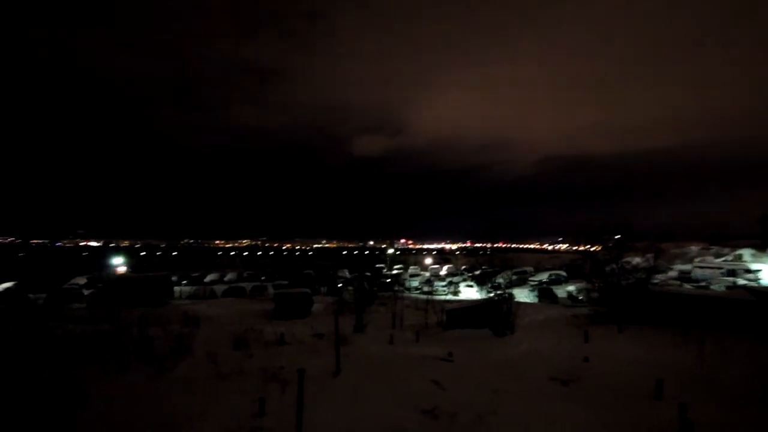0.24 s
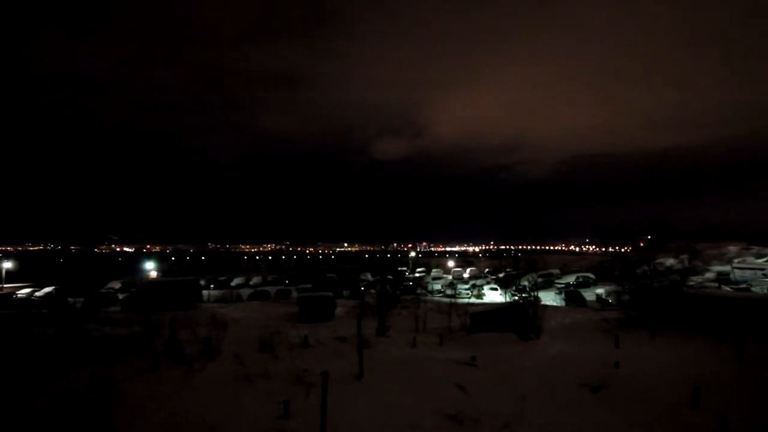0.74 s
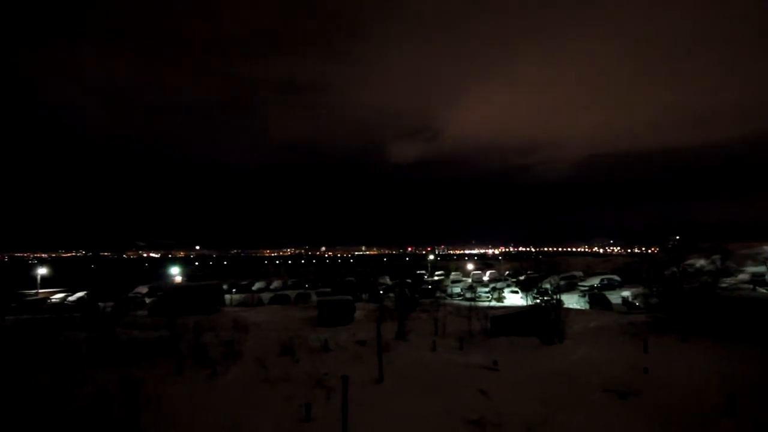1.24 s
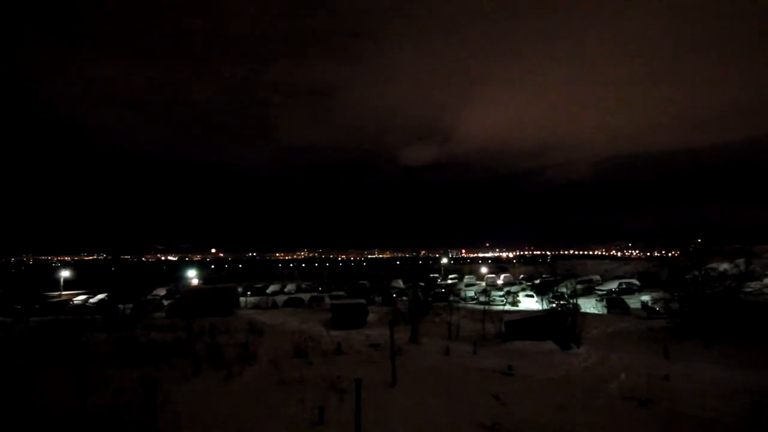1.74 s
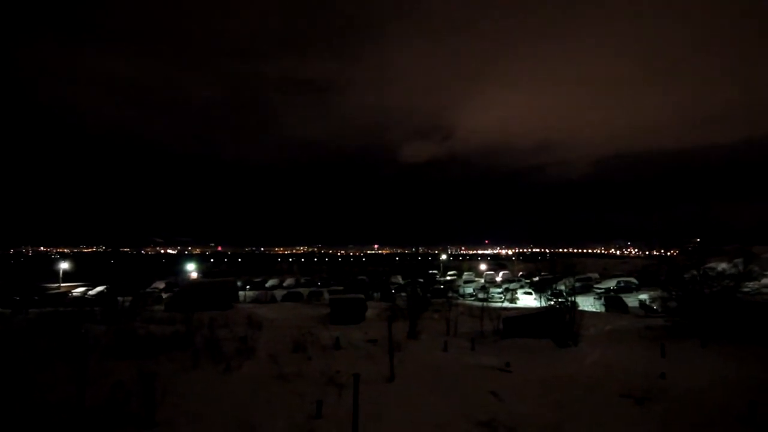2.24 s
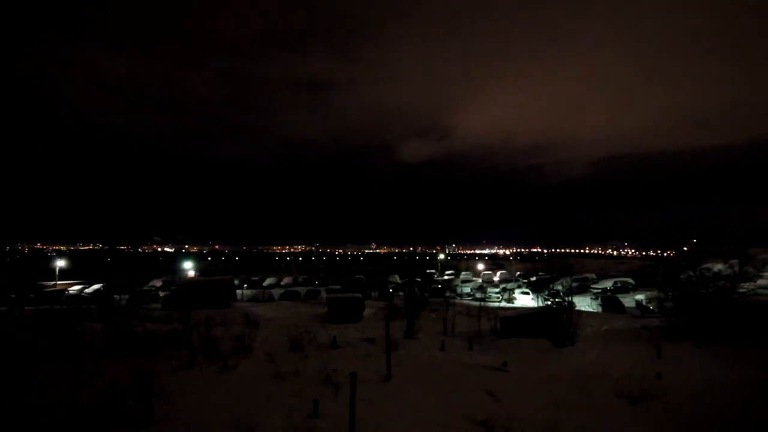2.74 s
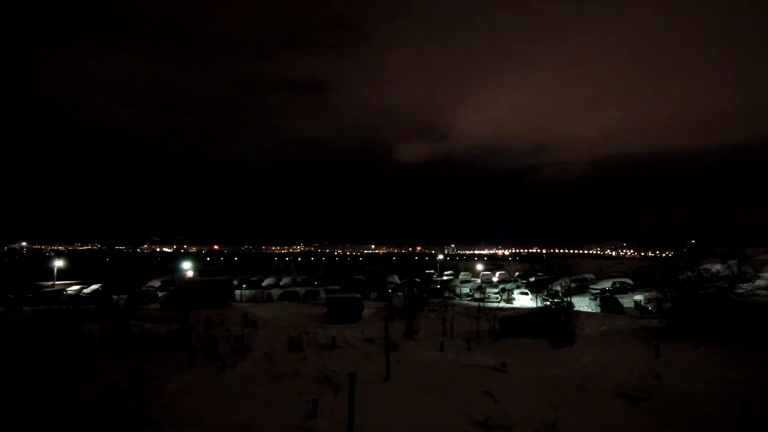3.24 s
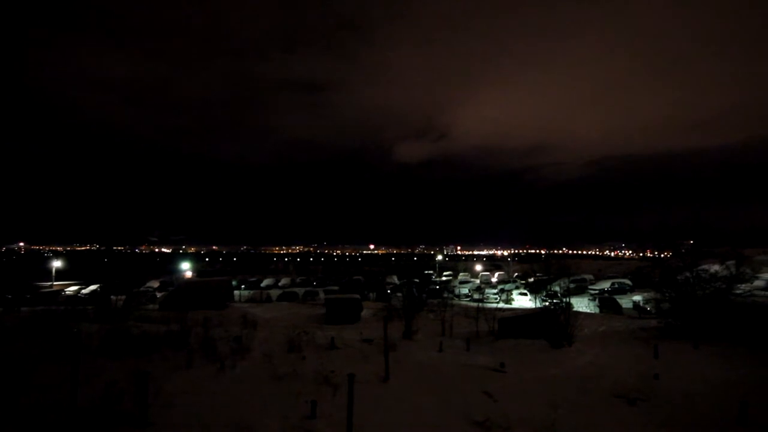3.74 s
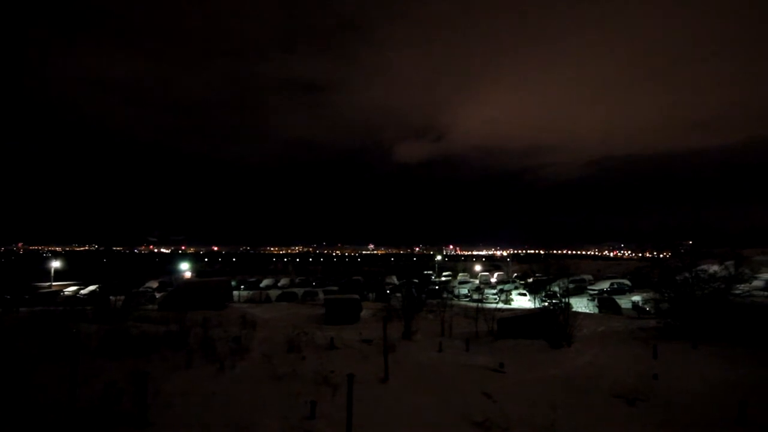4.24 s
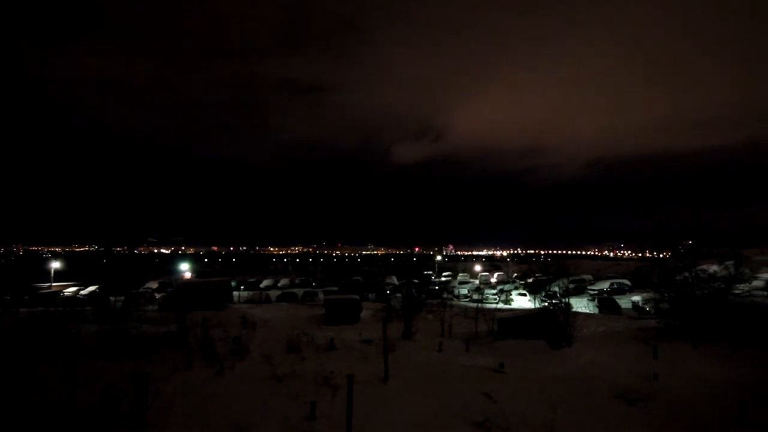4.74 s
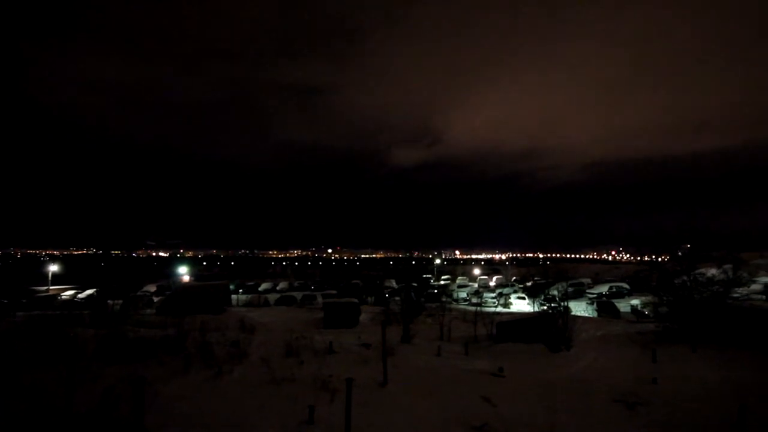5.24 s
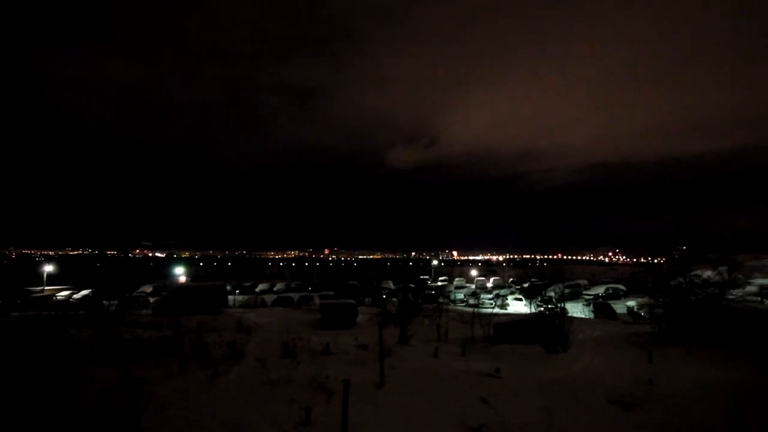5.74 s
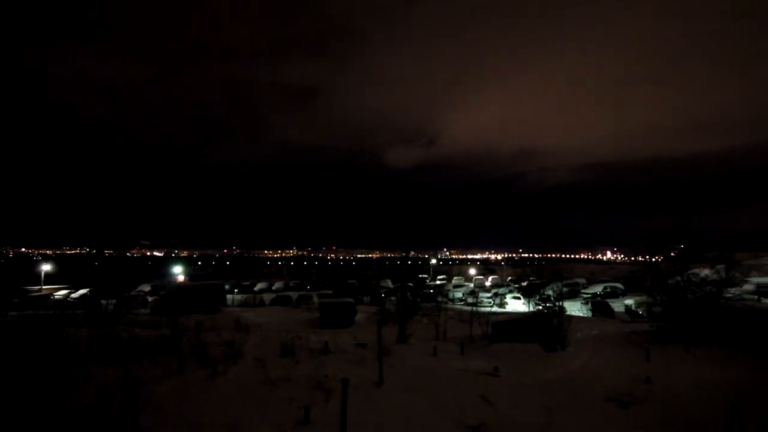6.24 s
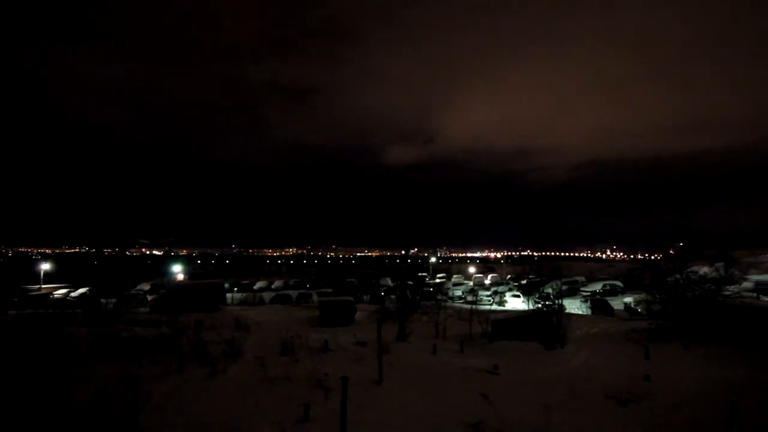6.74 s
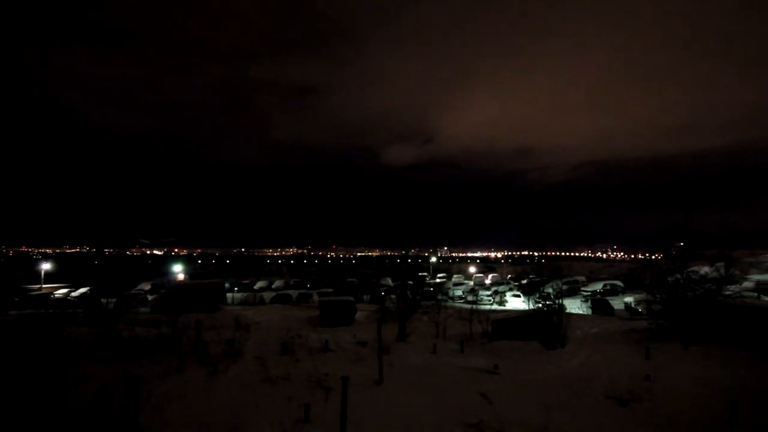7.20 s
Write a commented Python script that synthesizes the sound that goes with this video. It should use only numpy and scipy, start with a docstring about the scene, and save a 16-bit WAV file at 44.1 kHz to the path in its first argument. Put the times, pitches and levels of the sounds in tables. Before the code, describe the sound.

Outdoors on a snowy hillside at night, hundreds of distant fireworks blend into a steady, dull, bubbling rumble. Single booms and hollow knocks stand out, and nearer rockets bang, then crack back from house walls a quarter second later. One enormous low boom overloads the handheld camera's microphone past the middle, then bangs come thicker until the end. Small finger ticks and sleeve rustle occur early.

```python
"""Countless far fireworks over a city merge into a rumble with single booms, heard from a snowy hillside at night.
Far bursts are grains and thuds of noise and decaying swings; bangs are damped pressure swings with reflections.
Nearer rockets also wash back from a wooded slope as filtered grains and crack off house walls as delayed echoes.
One heavy shell overloads the microphone. The hand-held camera ticks, a sleeve rustles and a cuff scrapes."""
import sys
import numpy as np
from scipy import signal
from scipy.fft import rfft, irfft, next_fast_len
from scipy.io import wavfile
from scipy.ndimage import map_coordinates

SR = 44100
rng = np.random.default_rng(int(sys.argv[2]) if len(sys.argv) > 2 else 0)


def inscribe(sig):
    """Save sig as 16-bit PCM at rate SR to the path in sys.argv[1].

    A 1-D sig is mono; a 2-D sig holds one channel per row.
    Samples are clipped to [-1, 1] before scaling.
    """
    pcm = np.round(np.clip(np.atleast_2d(sig).T, -1, 1) * 32767)
    wavfile.write(sys.argv[1], SR, pcm.astype(np.int16))


N = 329427

# nearer rockets: (t/s, bang level/dB, bang f/Hz, direct snap level/dB, slope wash level/dB,
# near walls level/dB, far wall crack level/dB, far wall thump level/dB, treble level/dB)
ROCKETS = [ (0.408, -4, 450, -16.5, -23.5, -9.5, 4, -17, 0), (2.248, -16, 438, -14, -25, -11.5, -3.5, 0, 2),
           (2.628, -24, 406, -36, -27, -16, -30, -26, -5), (3.381, -7, 410, -20, -24, -10.5, -8, -7, 1.5),
           (3.532, -8, 300, -16, -28, -12.5, -3.5, -8, 2), (4.097, -3, 420, -17.5, -21, -13, 0, -2, 0.5),
           (4.9172, -2, 497, -9, -21.5, -9, -2, -1.5, 2),
           (5.228, -12, 493, -21.5, -27, -13, -6.5, -10, -0.5),
           (6.005, -6.5, 638, -19, -24, -14.5, -10, -7.5, -0.5),
           (6.031, -6.5, 524, -16, -23.5, -11.5, -4.5, -9, -2.5),
           (6.335, -4.5, 373, -33, -34, -27.5, -18, -25, 3),
           (6.518, -3, 355, -13, -26.5, -11, -6, -5.5, 2.5),
           (7.0837, -3.5, 552, -6.5, -27, -9, -4, -7, 3.5), (7.295, -3, 445, -15, -28, -13.5, -15, -11, 0)]
# echoes from the same near walls for every rocket: (delay t/s, dull knock level/dB, sharp spatter level/dB)
NEAR_WALLS = [(.024, -1.5, -20.5), (.068, 0.5, -9), (.1, -2.5, -15), (.125, 1, -10), (.2, -2, -18)]


def amp(db):
    """Turn decibels into an amplitude factor."""
    return 10 ** (np.asarray(db) / 20)


def unit(x):
    """Scale a sound to rms 1."""
    return x / np.sqrt(np.mean(x ** 2) + 1e-20)


def level_curve(rows):
    """Draw straight lines through (t/s, level/dB) points, one value per sample."""
    s, db = np.transpose(rows)
    return np.interp(np.arange(N) / SR, s, db)


def add(track, s, sound):
    """Mix a sound into the track at s seconds."""
    start = max(round(s * SR), 0)
    track[start:start + len(sound)] += sound[:max(N - start, 0)]


def coloured(x, spectrum, size=4096):
    """Shape x with the minimum-phase filter through (f/Hz, level/dB) points, then scale it to rms 1."""
    hz, db = np.transpose(spectrum)
    bins_hz = np.fft.rfftfreq(size, 1 / SR)
    gain = amp(np.interp(np.log(bins_hz + 1), np.log(hz), db))
    # folding the cepstrum makes the filter causal, so attacks stay sharp
    cepstrum = irfft(np.log(gain))
    cepstrum[1:size // 2] *= 2
    cepstrum[size // 2 + 1:] = 0
    impulse = irfft(np.exp(rfft(cepstrum)))
    return unit(signal.fftconvolve(x, impulse)[:N])


def lowpass(x, hz):
    """Roll off the highs above hz at 12 dB per octave."""
    return signal.sosfilt(signal.butter(2, min(hz, SR / 2 - 100), fs=SR, output="sos"), x)


def patter(rate, spread_db):
    """Impulses at random moments, rate a second on average, of random sign and uneven strength."""
    strength = amp(spread_db * np.clip(rng.standard_normal(N), -2, 2))
    hits = rng.random(N) < rate / SR
    return hits * strength * rng.choice([-1, 1], N)


def wobble(rate):
    """A smooth random curve, rate knots a second."""
    return map_coordinates(rng.standard_normal(N // 50), [np.arange(N) * rate / SR], mode="wrap")


def swells(rows, attack, t60):
    """Joint envelope of (start t/s, hold t/s, level/dB) events that build, hold and die; their powers add."""
    power = np.zeros(N)
    for s, hold, db in rows:
        t = np.arange(int((attack + hold + t60) * SR)) / SR
        rise = np.minimum(t / attack, 1)
        fall_db = 60 * np.maximum(t - attack - hold, 0) / t60
        add(power, s, (rise * amp(db - fall_db)) ** 2)
    return np.sqrt(power)


def strokes(rows):
    """Envelope of (middle t/s, half length t/s, level/dB) strokes that swell and fade smoothly."""
    t = np.arange(N) / SR
    return sum(amp(db) * np.exp(-((t - s) / half) ** 2) for s, half, db in rows)


def report(hz, cycles, air_hz, scatter, span, rise=0):
    """A pressure swing of peak 1, built over rise cycles and damped 60 dB in cycles, with a duller trail.

    The trail of reflections from ground and nearby walls lasts about span seconds."""
    t = np.arange(SR // 8) / SR
    front = 1 - np.exp(-(t * hz / (rise + 1e-6)) ** 2)
    decay = amp(-60 * t * hz / cycles)
    swing = lowpass(front * np.sin(2 * np.pi * hz * t) * decay, air_hz)
    # suction follows the push, so no net pressure is left
    swing = signal.sosfilt(signal.butter(2, 0.5 * hz, "high", fs=SR, output="sos"), swing)
    swing /= np.abs(swing).max()
    # a handful of separate paths, which comb the spectrum
    delays = 1 / hz + span * (np.arange(7) + rng.random(7)) / 7
    places = np.minimum(delays * SR, len(t) - 1).astype(int)
    strengths = rng.choice([-1, 1], len(delays)) * np.exp(-delays / span)
    paths = np.bincount(places, strengths, len(t))
    trail = lowpass(signal.fftconvolve(swing, paths)[:len(t)], 2600)
    return swing + scatter * trail / np.abs(trail).max()


def boom(hz):
    """A burst dulled by distance: the lower it is, the less treble is left."""
    return report(hz, cycles=6.0, air_hz=2.14 * hz, scatter=0.54, span=.018)


def crack(hz):
    """A sharp snap that rings briefly; the duller it is, the stronger the hollow knock under it."""
    snap = report(hz, cycles=1.72, air_hz=2000 + 1.9 * hz, scatter=0.65, span=.013)
    ring = report(1.42 * hz, cycles=4.4, air_hz=2370, scatter=0.31, span=0.016)
    knock = report(hz=471, cycles=9, air_hz=970, scatter=1.2, span=0.01375)
    mix = amp(-5.5) * snap + amp(-16.5) * ring + amp(-10.0) * 1100 / hz * knock
    return lowpass(mix, hz=5500)


def barrage():
    """Hundreds of far bursts a second run together; less distant ones fill the midrange, and strings crackle."""
    # level of the far barrage, with the camera's ducking after loud bangs drawn in: (t/s, level/dB)
    far_level = [(0.0, -19), (.6, -20), (.72, -20), (.98, -18), (1.35, -18), (1.9, -20), (2.25, -19),
                 (2.45, -18.5), (2.6, -22.5), (2.75, -16), (2.93, -22), (3.1, -18.5), (3.6, -19.5),
                 (4.12, -20), (4.5, -22.5), (4.66, -19), (4.76, -23), (4.92, -19), (5.2, -24), (5.6, -18.5),
                 (5.9, -20), (6.3, -19), (6.85, -20), (7.14, -17.5), (7.47, -21)]
    # level of its midrange: (t/s, level/dB)
    mid_level = [(0, -32), (.15, -40.5), (.35, -32.5), (.85, -32.5), (1.1, -33), (1.3, -34.5),
                 (1.52, -46.5), (1.66, -29), (1.85, -45), (2.06, -30), (2.2, -50), (2.6, -41.5),
                 (2.9, -32.5), (3.15, -29), (3.35, -34.5), (3.95, -34), (4.48, -29), (4.75, -34),
                 (5.3, -34.5), (5.65, -27), (5.9, -33.5), (6.4, -31.5), (7.47, -30)]
    # far strings of firecrackers: (start t/s, hold t/s, level/dB)
    cracker_strings = [(0.68, 0.14, -42), (1.2, 0.24, -38), (2.93, 1, -40), (4.53, 0.013, -32.5),
                       (5.45, 0.58, -40.5), (6.3, 0.84, -33.5)]
    # tone colours of far rumble, midrange and firecrackers: (f/Hz, level/dB)
    rumble_colour = [(20, -16.5), (50, -8.5), (95, -5), (135, 1), (180, -1), (240, 1.5), (320, -1.5),
                     (420, 2.5), (550, -9.5), (800, -18.5), (1200, -29.5), (2500, -56.5), (6000, -88)]
    mid_colour = [(250, -25), (520, -3.5), (800, -1.5), (1150, -15), (2500, -33), (6000, -67)]
    crackle_colour = [(250, -27.5), (700, 8.5), (1200, 7.5), (2400, 0.5), (3200, -12), (4200, -17),
                      (6000, -40.5), (16000, -71)]
    roar_db, thuds_db = -.5, -6  # merged and separate bursts, against the far level
    crackle_floor_db = -45  # the crackle of the whole town never stops

    roar = coloured(patter(rate=900, spread_db=2.0), rumble_colour)
    swell = amp(1.97 * wobble(rate=12))
    bursts = amp(roar_db) * swell * roar + amp(thuds_db) * thuds(count=520)
    far = amp(level_curve(far_level)) * bursts

    mid_grains = coloured(patter(rate=400, spread_db=0.5), mid_colour)
    mids = amp(level_curve(mid_level) + 3.0 * wobble(rate=18)) * mid_grains

    string_swells = swells(cracker_strings, attack=0.034, t60=0.65)
    crackle_envelope = np.hypot(amp(crackle_floor_db), string_swells)
    crackle = crackle_envelope * coloured(patter(rate=1400, spread_db=1), crackle_colour)
    return far + mids + crackle


def thuds(count):
    """Far shells that just stand out of the rumble, each with its own pitch and a few cycles of life."""
    pitch, size = rng.standard_normal((2, count, 1))
    start = rng.integers(0, N, (count, 1))
    n = np.arange(SR // 16)
    hz = 310 * np.exp(0.42 * np.clip(pitch, -2.2, 1.3))
    cycle = hz * n / SR
    envelope = cycle * np.exp(-cycle / 1.5)
    swings = amp(1.2 * np.clip(size, -2, 1)) * np.sin(2 * np.pi * cycle) * envelope
    return unit(np.bincount((start + n).ravel(), swings.ravel(), N)[:N])


def singles():
    """Single booms, hollow knocks and sharp snaps; each keeps treble in proportion to its pitch."""
    # single booms: (t/s, level/dB, f/Hz)
    lone_booms = [ (0.014, -5.5, 356), (0.213, -7.5, 258), (0.337, -8, 315), (0.768, -16.5, 71),
                  (0.807, -4, 215), (0.812, -1, 394), (0.912, -4, 278), (1.005, -12, 300), (1.038, -21, 60),
                  (1.158, -6.5, 264), (1.33, -20, 269), (1.58, -7, 237), (1.702, -6.5, 320),
                  (1.752, -10.5, 232), (2.014, -4, 188), (2.07, -4, 174), (2.078, -1.5, 366),
                  (2.374, 2.5, 179), (2.534, -4.5, 384), (2.773, -4, 284), (2.788, -17.5, 70),
                  (3.019, -18, 91), (3.07, -11.5, 183), (3.135, -15.5, 69.4), (3.146, -3.5, 193),
                  (3.421, -10, 250), (3.641, -11, 94), (3.734, -19.5, 80), (3.846, -3, 427),
                  (4.075, -10, 156), (4.16, -7.5, 300), (4.446, -14, 413), (4.645, -7, 252),
                  (4.835, -10.5, 434), (5.025, -22, 68.5), (5.537, -10, 198), (5.707, -7.5, 276),
                  (6.053, -4, 360), (6.125, -4.5, 390), (6.275, -13, 115), (6.419, -4, 300),
                  (6.575, -14, 120), (6.893, -8, 258), (7.234, -12.5, 100), (6.99, -10, 260),
                  (7.2848, -1, 398)]
    # hollow knocks: wall echoes of rocket bangs, and a few other short knocks: (t/s, level/dB, f/Hz)
    extra_knocks = [(1.244, -13, 670), (1.606, -18, 680), (3.404, -16, 690), (3.557, -7.5, 610),
                    (3.632, -12.5, 646), (4.109, -3.5, 440), (4.122, -7, 465), (4.942, -9, 560),
                    (5.044, -8, 616), (5.353, -9.5, 690), (5.667, -9, 706), (6.031, -8, 565),
                    (6.642, -13, 557), (7.109, -7.5, 645), (7.154, -10.5, 560), (7.212, -8.5, 634),
                    (7.417, -16, 616)]
    # sharp snaps: stronger wall echoes of rockets, and single firecrackers: (t/s, level/dB, f/Hz)
    sharp_snaps = [(0.472, -12, 2200), (0.545, -11, 1800), (0.57, -17, 2400), (1.139, -17, 1900),
                   (1.215, -19.5, 2150), (1.303, -25, 1400), (2.41, -19, 2600), (2.874, -20, 1900),
                   (3.821, -16, 1700), (4.353, -10, 1500), (4.578, -12, 1390), (4.986, -5, 2200),
                   (5.128, -11, 1310), (5.354, -5, 1900), (5.947, -16.5, 1690), (6.277, -11, 3000),
                   (6.449, -12, 2000), (6.586, -11, 1700), (6.643, -8.5, 1780), (6.888, -17, 1300),
                   (7.155, -7, 1590), (7.362, -12, 3000)]
    # many paths round off a far boom's front; its first swing comes early
    swell_cycles, lead_cycles = 0.85, .6

    out = np.zeros(N)
    for s, db, hz in lone_booms:
        far_boom = report(hz, cycles=4.24, air_hz=2.05 * hz, scatter=0.49, span=0.0177, rise=swell_cycles)
        add(out, s - lead_cycles / hz, amp(db) * far_boom)
    for s, db, hz in extra_knocks:
        add(out, s, amp(db) * report(hz, cycles=6.8, air_hz=1.9 * hz, scatter=0.49, span=.009))
    for s, db, hz in sharp_snaps:
        add(out, s, amp(db) * lowpass(crack(hz), hz=2.4 * hz))
    return out


def rockets():
    """Each bang arrives mostly dull over the ridge, knocks off the near walls and cracks back from the far one."""
    snap_hz, knock_hz = 1400, 606
    wall_delay_s, wall_crack_hz = .245, 1160  # the far wall gives the sharpest echo
    wall_knock_hz = 468  # it also returns the bang's low swing
    wall_body_hz, wall_body_db = 1640, -8  # its broad front spreads the crack into a short thud
    roof_lag_s, roof_db, roof_hz = 0.0097, -9, 1710  # a roof behind it doubles the crack

    out = np.zeros(N)
    for s, bang_db, hz, direct_db, _, near_db, far_db, thump_db, _ in ROCKETS:
        add(out, s, amp(bang_db) * boom(hz) + amp(direct_db) * crack(snap_hz))
        for delay, knock_db, _ in NEAR_WALLS:
            add(out, s + delay, amp(near_db + knock_db) * boom(knock_hz))
        wall_s = s + wall_delay_s
        add(out, wall_s, amp(far_db) * crack(wall_crack_hz) + amp(thump_db) * boom(wall_knock_hz))
        wall_body = report(wall_body_hz, cycles=3, air_hz=1490, scatter=0.52, span=.014)
        add(out, wall_s, amp(far_db + wall_body_db) * wall_body)
        add(out, wall_s + roof_lag_s, amp(far_db + roof_db) * crack(roof_hz))
    return out


def heavy_shell():
    """The one big shell comes by a clear path: a few huge, uneven swings and little trail."""
    # the shell: (t/s, level/dB, f/Hz)
    shell = (4.6156, 20, 247)
    # its other swings, against the main one: (f/Hz, level/dB, decay/cycles)
    shell_swings = [(176.5, -16.5, 2.2), (405, -13.5, 5)]
    s, db, hz = shell
    out = np.zeros(N)
    blast = report(hz, cycles=6.8, air_hz=700, scatter=.06, span=.016)
    for part_hz, part_db, cycles in shell_swings:
        blast = blast + amp(part_db) * report(part_hz, cycles, air_hz=900, scatter=.06, span=.016)
    add(out, s, amp(db) * blast)
    return out


def spatters():
    """Tight bunches of tiny snaps: bangs and rocket echoes broken up by house fronts, perhaps some stars."""
    # bunches of tiny pops: rocket echoes broken up by house fronts, perhaps some crackling stars:
    # (t/s, level/dB, treble level/dB)
    pop_bunches = [(0.601, -19.5, -7), (2.684, -27, -3), (2.696, -21, -5), (2.733, -25, -5),
                   (2.755, -20.5, -4), (2.776, -25, -2), (3.631, -17, -3), (4.178, -25, 4),
                   (4.245, -19.5, 6), (5.018, -24, 4), (5.352, -16.5, 3), (6.611, -18.5, 4),
                   (7.387, -23, 2), (7.418, -22, -1)]
    # tone colours of the snaps and of their treble: (f/Hz, level/dB)
    snap_colour = [(300, -17.5), (800, 4.5), (1400, 5), (2300, 0.5), (3200, -13.5), (4500, -11),
                   (7000, -31), (15000, -64.5)]
    sparkle_colour = [(2000, -22), (4000, 14), (6000, -0.5), (9000, -14.5), (12000, -19.5), (15000, -28.5)]
    rise_s, t60_s = 0.0016, 0.029  # a bunch gathers and thins out
    sparkle_db, direct_share_db = -16, -11  # treble; the share that comes with the bang itself

    bunches = list(pop_bunches)
    for s, _, _, direct_db, _, near_db, _, _, treble_db in ROCKETS:
        bunches.append((s, direct_db + direct_share_db, treble_db))
        bunches += [(s + delay, near_db + db, treble_db) for delay, _, db in NEAR_WALLS]
    body = swells([(s, .002, db) for s, db, _ in bunches], rise_s, t60_s)
    sparkle = swells([(s, .003, db + treble_db) for s, db, treble_db in bunches], rise_s, t60_s)
    snaps = patter(rate=5000, spread_db=0.0)
    treble = amp(sparkle_db) * sparkle * coloured(snaps, sparkle_colour)
    return body * coloured(snaps, snap_colour) + treble


def slope():
    """Tree trunks return each rocket as a grainy wash; the shortest paths keep the most treble."""
    # tone colours of the wash and of its treble: (f/Hz, level/dB)
    wash_colour = [(150, -22), (480, 12.5), (750, 9.5), (900, 3.5), (1200, 2.5), (2100, -2), (2700, -7.5),
                   (3300, -14.5), (5000, -20.5), (7500, -42.5), (15000, -58)]
    fizz_colour = [(1500, -22.5), (4000, 19), (7000, -3), (15000, -32.5)]
    wash_hold_s, fizz_hold_s, fizz_delay_s = 0.15, 0.1, 0.0059

    body_events, fizz_events = [], []
    for s, _, _, _, wash_db, _, _, _, treble_db in ROCKETS:
        body_events.append((s, wash_hold_s, wash_db))
        fizz_events.append((s + fizz_delay_s, fizz_hold_s, wash_db + treble_db))
    body = swells(body_events, attack=0.069, t60=0.48)
    fizz = swells(fizz_events, attack=0.044, t60=0.3)

    # a haze from the branches, and separate pops from the big trunks
    haze = unit(patter(rate=3000, spread_db=1.0))
    pops = unit(patter(rate=200, spread_db=2.5))
    grains = haze + 0.64 * pops
    # each echo also bounces off the snow, with a lag that drifts around 1.1 ms
    lag = .0011 * np.exp(.35 * wobble(rate=30))
    bounced = grains[np.maximum(np.arange(N) - (lag * SR).astype(int), 0)]
    grains = grains + 0.77 * bounced
    # trees stand in clumps, so their echoes arrive in clumps
    clumps = unit(amp(1.6 * wobble(rate=75)))
    treble = amp(-18.5) * fizz * coloured(grains + 0.53 * pops, fizz_colour)
    return clumps * (body * coloured(grains, wash_colour) + treble)


def handling():
    """Finger ticks, fluttering sleeve and scraping cuff over the microphone's own hiss."""
    # strokes of the sleeve: (middle t/s, half length t/s, level/dB)
    sleeve_strokes = [(0.01, 0.031, -49.5), (0.259, 0.071, -53.5), (0.44, 0.1, -54), (0.85, 0.086, -59.5),
                      (1.348, 0.055, -49), (1.47, 0.072, -55), (5.7, 0.23, -64)]
    # the cuff scrapes on the case: (middle t/s, half length t/s, level/dB)
    cuff_scrapes = [(.245, 0.058, -53.5), (1.44, .007, -48.5)]
    # tone colours of sleeve, cuff and hiss: (f/Hz, level/dB)
    sleeve_colour = [(1000, -33.5), (3500, 5.5), (6000, 1.5), (7600, -2), (9500, -2), (12000, -5.5),
                     (16000, -9.5)]
    cuff_colour = [(3000, -26), (5000, -16), (6100, -4), (7200, -13), (16000, -33)]
    hiss_colour = [(500, 1), (4000, -4), (9000, -10.5), (16000, -16)]
    rest_db, flutter_db = -67.5, 3  # the sleeve between strokes; the cloth catches and slips

    flutter = amp(flutter_db * wobble(rate=99))
    cloth = coloured(patter(rate=4000, spread_db=2.5), sleeve_colour)
    rustle = (amp(rest_db) + strokes(sleeve_strokes)) * flutter * cloth
    scrape = strokes(cuff_scrapes) * coloured(patter(rate=1200, spread_db=3), cuff_colour)
    hiss = amp(-56.5) * coloured(rng.standard_normal(N), hiss_colour)
    return ticks() + rustle + scrape + hiss


def ticks():
    """Each touch of a finger is a dry click that also rings the camera's case."""
    # touches: (t/s, level/dB, t60/s, ring of the case against the click level/dB, hardness f/Hz)
    touches = [(0.301, -32, 0.012, -15, 14000), (0.3225, -36, .007, 16, 2900),
               (0.909, -23.5, 0.0051, 1.5, 14000), (1.027, -32, 0.02, -1.5, 12000),
               (1.039, -22, 0.026, 2, 17000), (1.243, -38, 0.012, -9, 12000),
               (1.469, -35.5, 0.018, -1.5, 9000), (4.926, -32.5, 0.025, -4, 9000),
               (5.037, -30, 0.064, -3, 9500)]
    # resonances of the case: (f/Hz, level/dB, t60/s)
    case_modes = [(1712, -7.5, 0.019), (2500, -2, .009), (3060, -0.5, .011), (4220, -10, 0.012),
                  (5850, -13, 0.011), (8650, -17, .012), (9740, -13.5, .02), (13200, -8, .014)]
    click_colour = [(200, -2.5), (2000, 8), (6000, -1.5), (13000, -5), (16000, -14.5)]  # (f/Hz, level/dB)

    clicks, pushes = np.zeros(N), np.zeros(N)
    t = np.arange(SR // 10) / SR
    for s, db, t60, ring_db, hz in touches:
        decay_db = db - 60 * t / t60
        add(clicks, s, amp(decay_db))
        add(pushes, s, lowpass(amp(decay_db + ring_db) * rng.standard_normal(len(t)), hz))
    ring = sum(amp(db - 60 * t / t60) * np.sin(2 * np.pi * hz * t) for hz, db, t60 in case_modes)
    case = signal.fftconvolve(pushes, ring / np.linalg.norm(ring))[:N]
    return case + clicks * coloured(rng.standard_normal(N), click_colour)


def scene():
    """Sum the fireworks, their echoes and the handling noise into one channel."""
    fireworks = barrage() + singles() + rockets() + heavy_shell() + spatters() + slope()
    return (fireworks + handling())[None]


def gain_control(x, threshold, depth_db, release):
    """Overloads turn the gain down, by depth_db at most; it creeps back over release seconds."""
    excess = np.maximum(np.abs(x) - threshold, 0) * 1000 / SR
    charge = signal.lfilter([1], [1, -np.exp(-1 / (release * SR))], excess)
    return x * amp(-depth_db * charge / (1 + charge))


def record(dry):
    """The camera rides its gain, clips at full scale and keeps nothing above its band limit."""
    top_hz = 16000
    ridden = gain_control(dry, threshold=0.53, depth_db=4.5, release=0.053)
    clipped = np.clip(ridden, -1, 1)
    size = next_fast_len(N + SR // 2)
    in_band = np.fft.rfftfreq(size, 1 / SR) < top_hz
    return irfft(rfft(clipped, size) * in_band, size)[..., :N]


dry = scene()
out = record(dry)
inscribe(out)
```